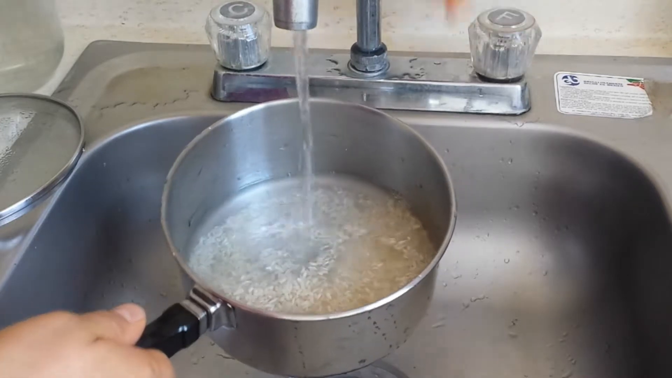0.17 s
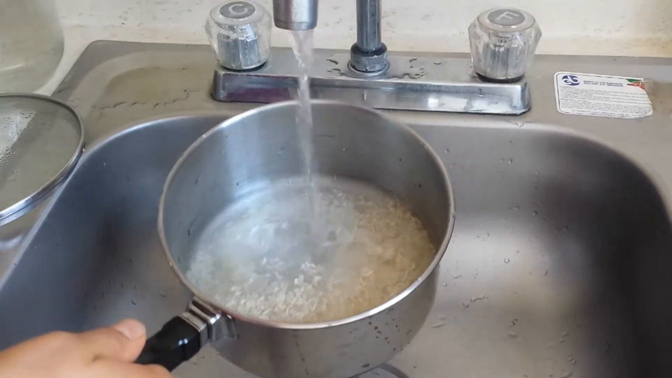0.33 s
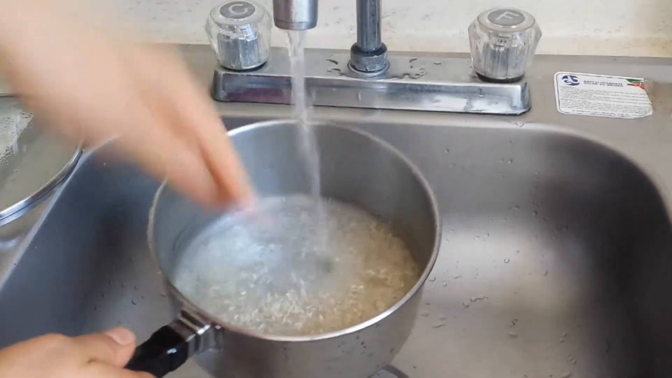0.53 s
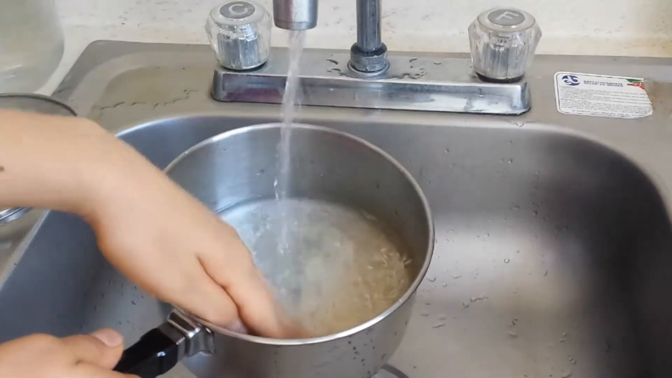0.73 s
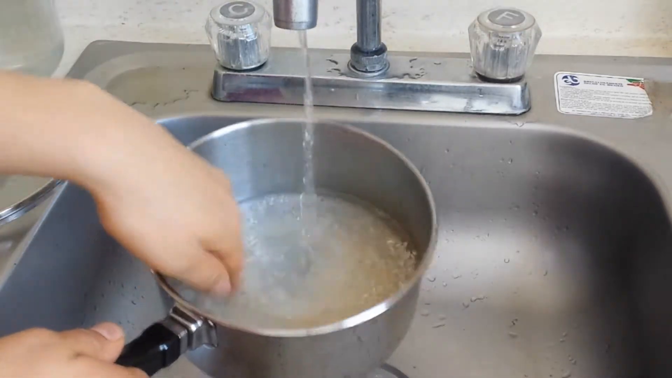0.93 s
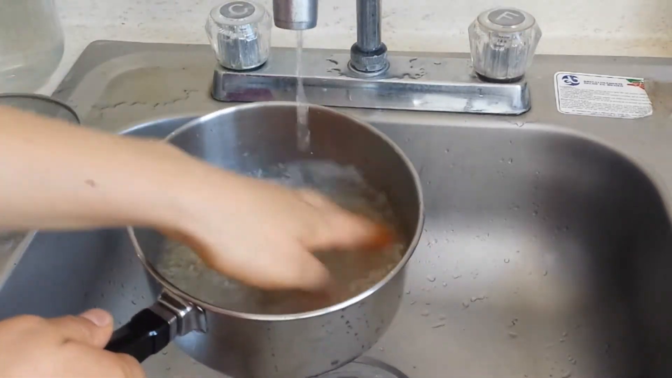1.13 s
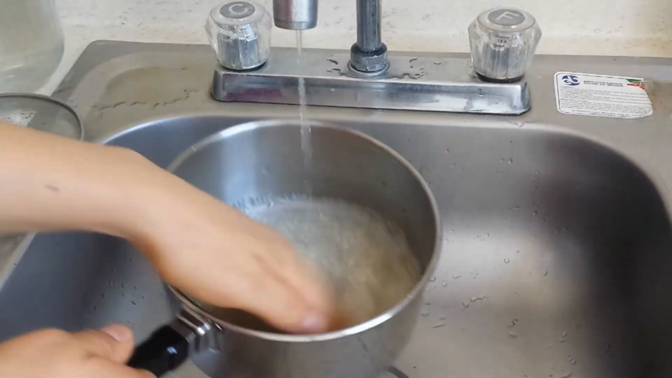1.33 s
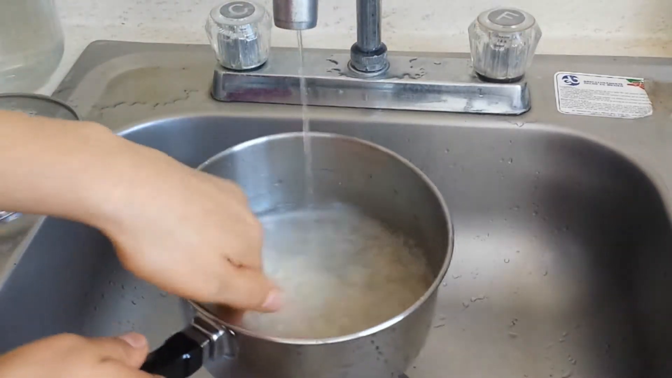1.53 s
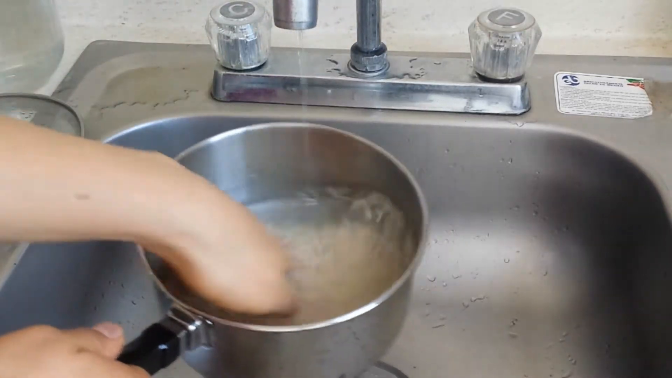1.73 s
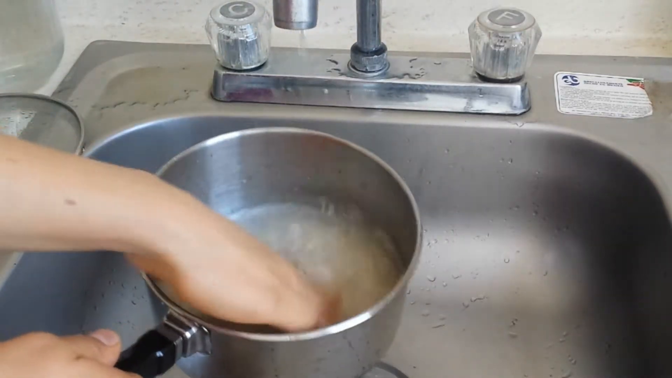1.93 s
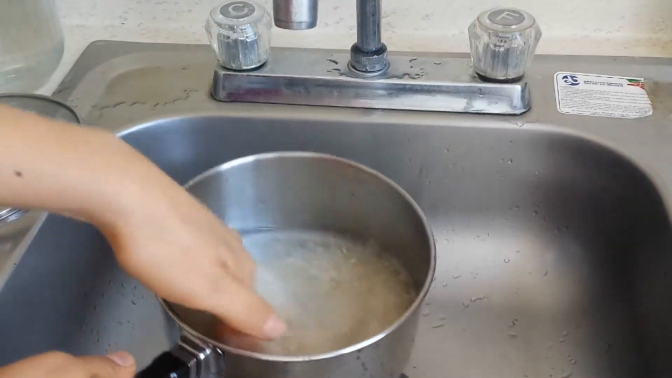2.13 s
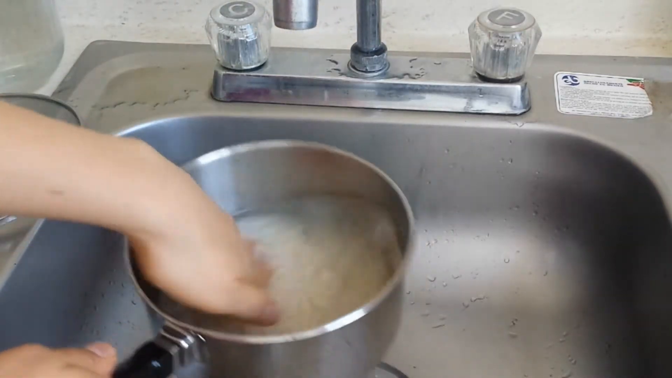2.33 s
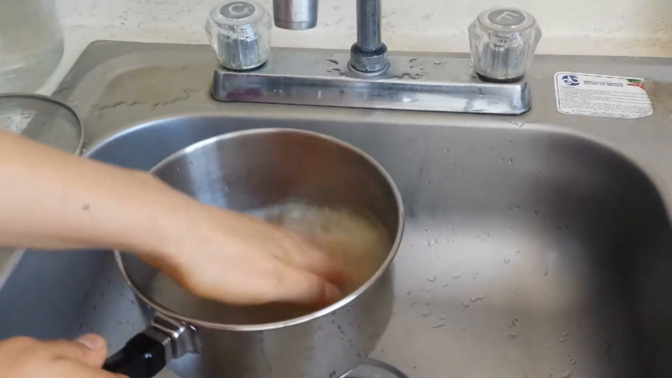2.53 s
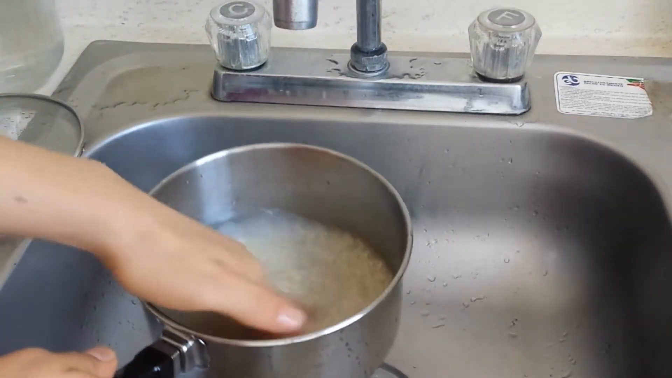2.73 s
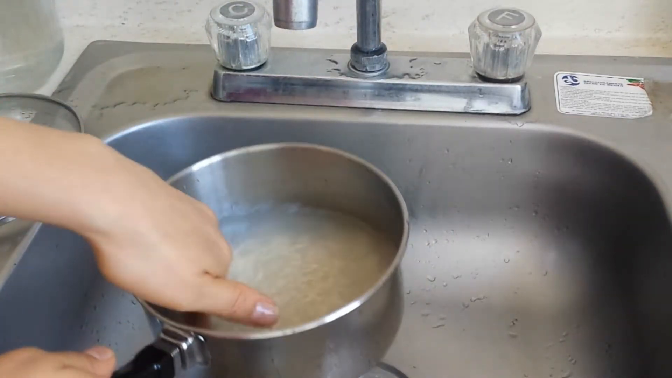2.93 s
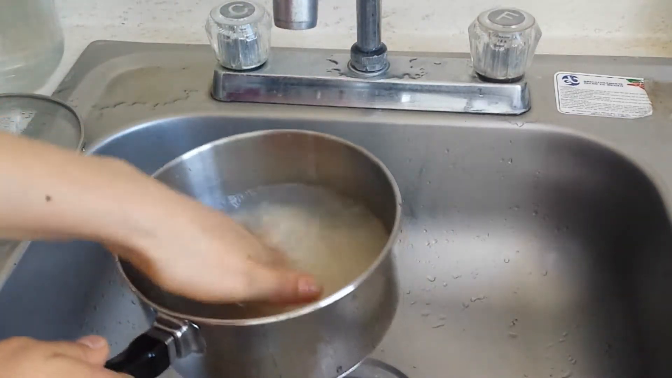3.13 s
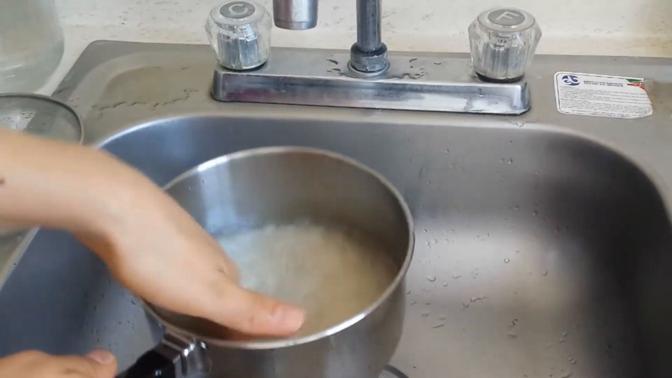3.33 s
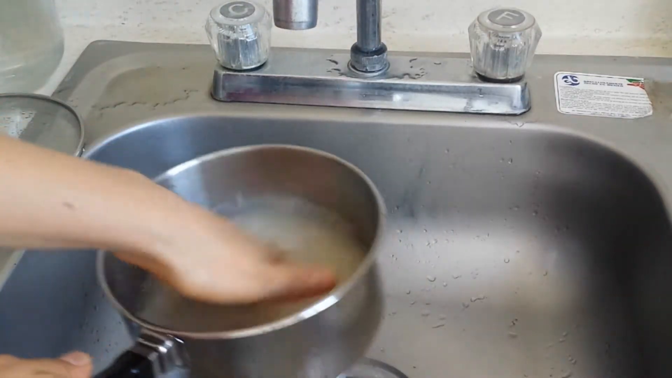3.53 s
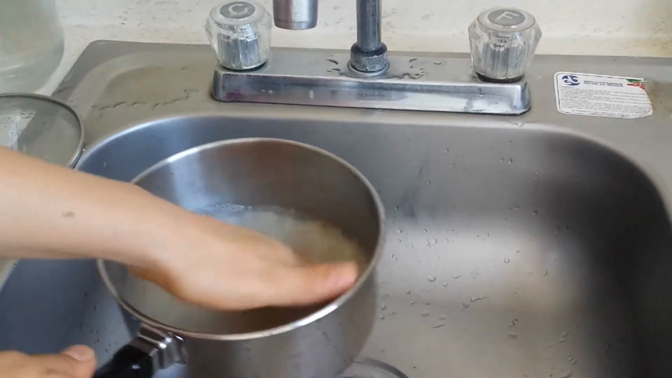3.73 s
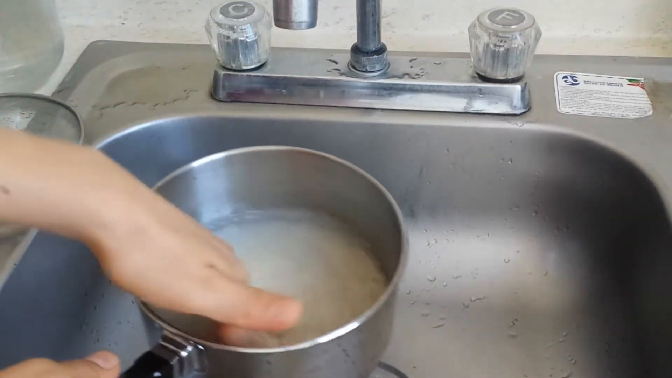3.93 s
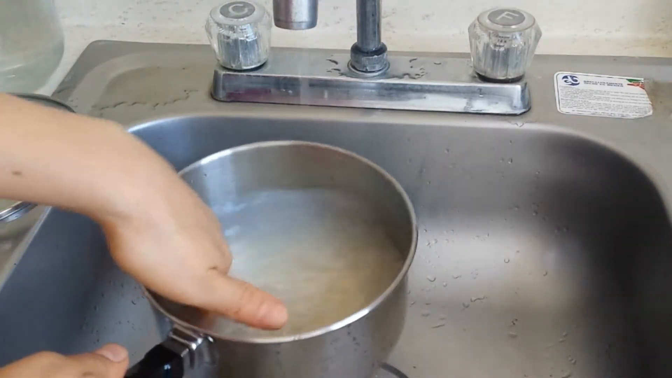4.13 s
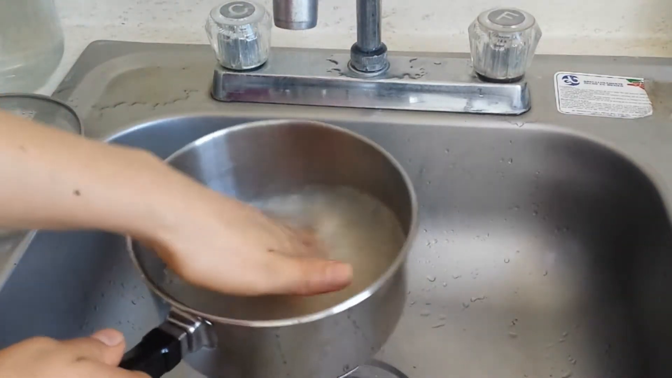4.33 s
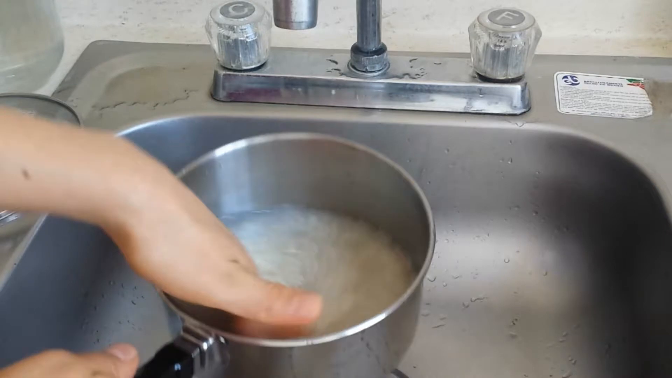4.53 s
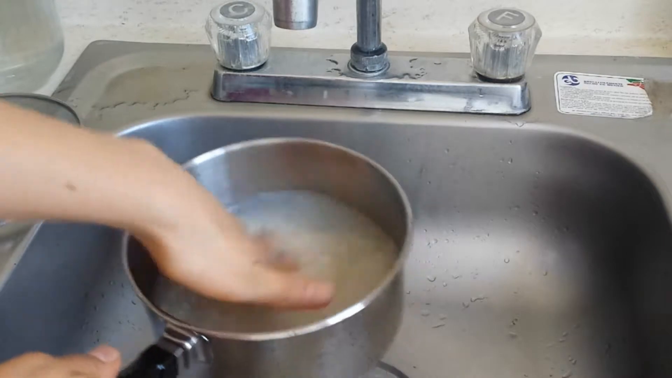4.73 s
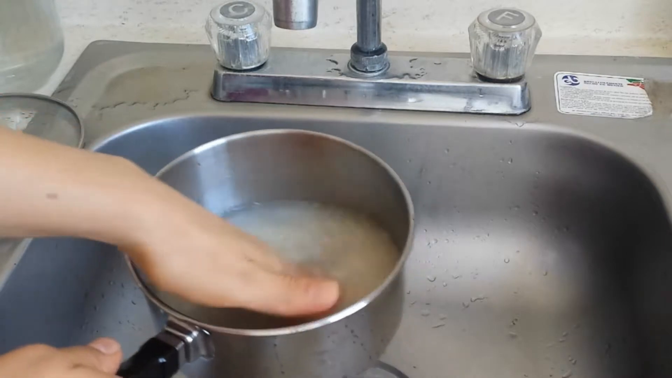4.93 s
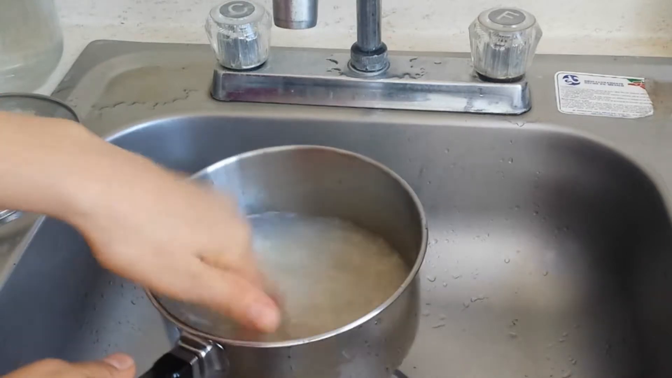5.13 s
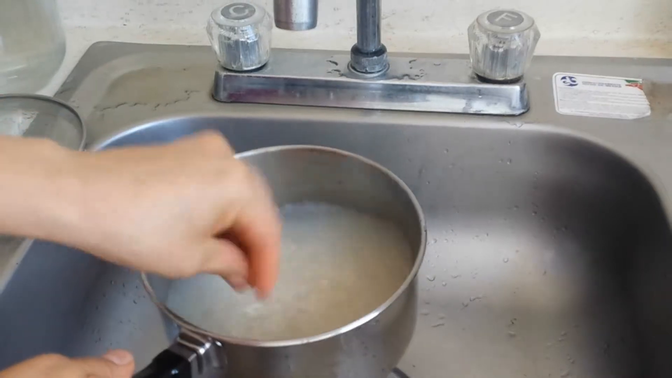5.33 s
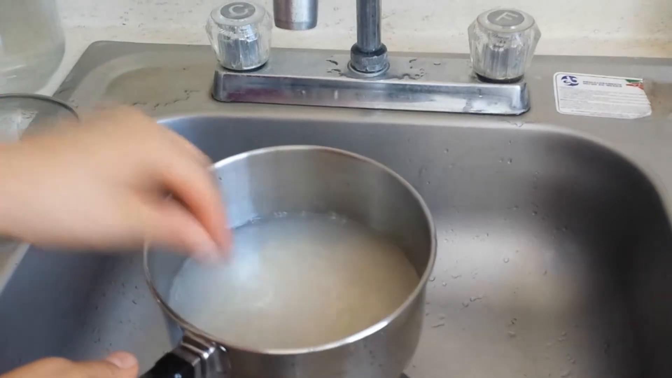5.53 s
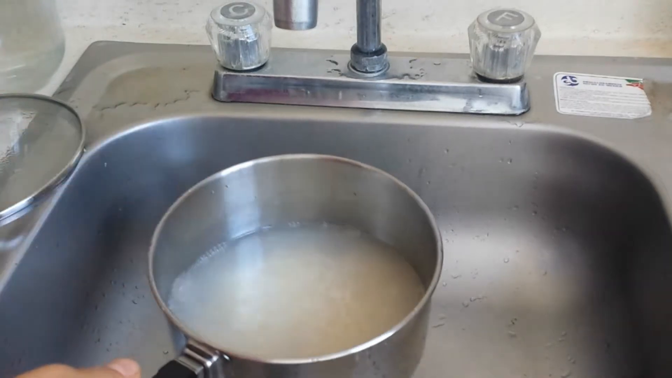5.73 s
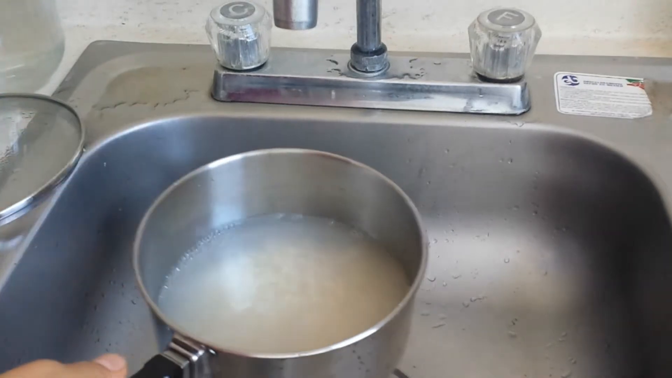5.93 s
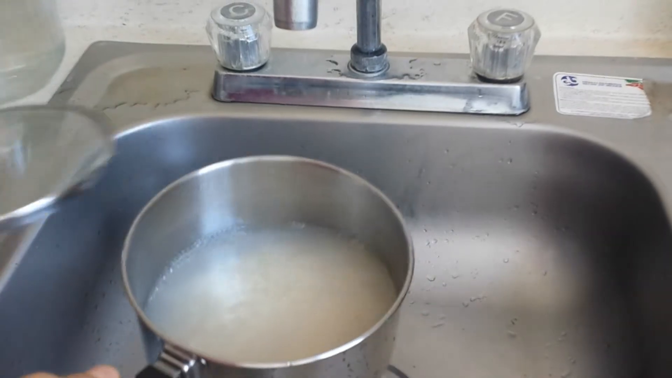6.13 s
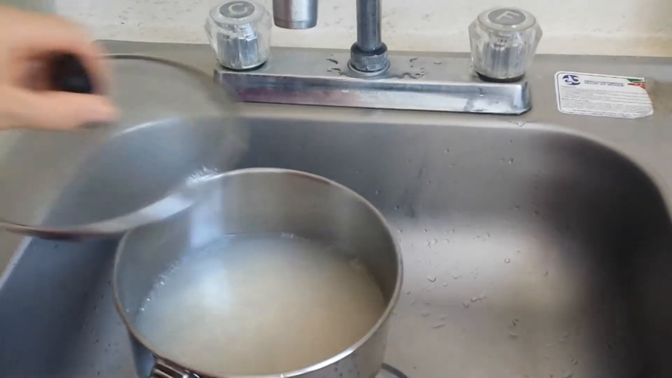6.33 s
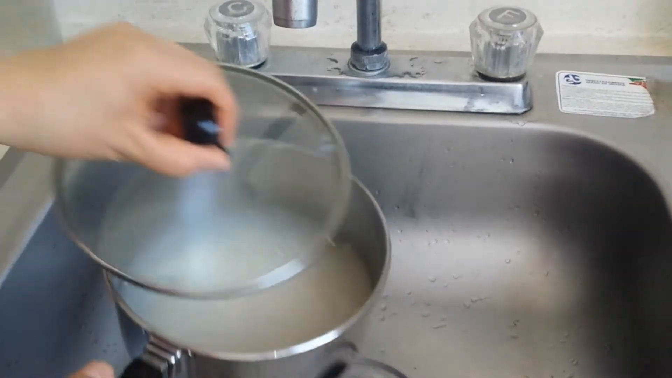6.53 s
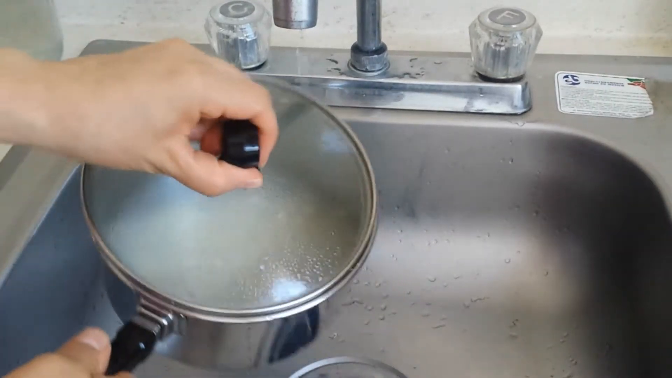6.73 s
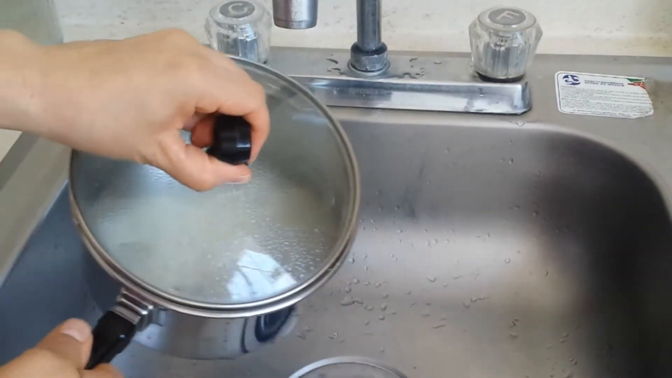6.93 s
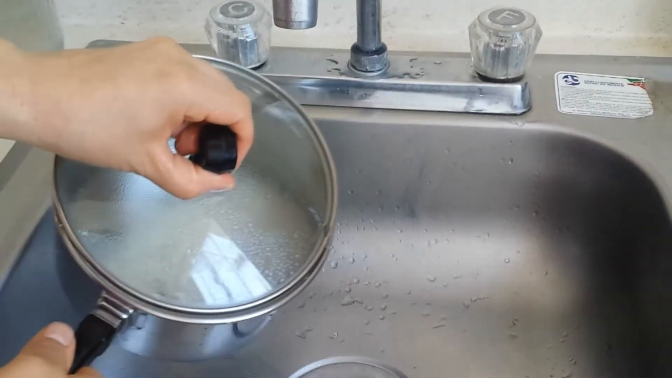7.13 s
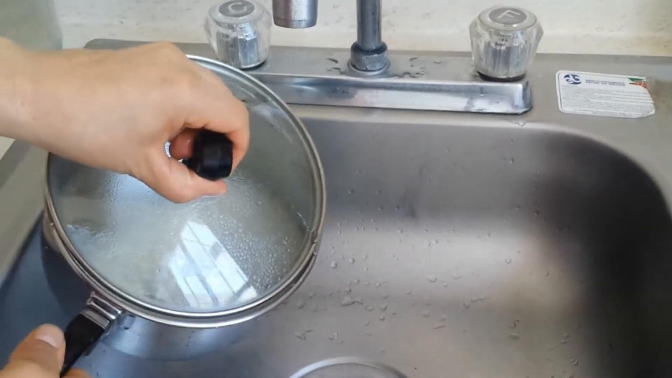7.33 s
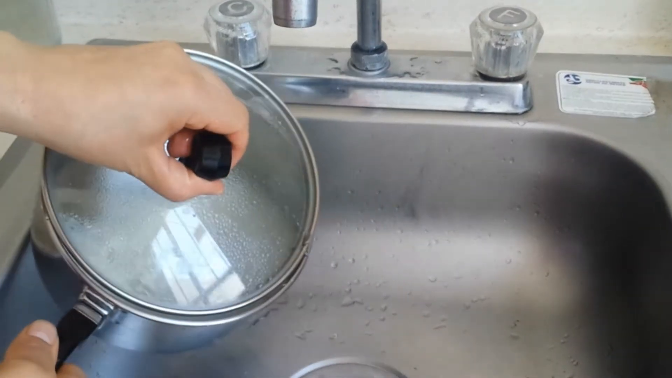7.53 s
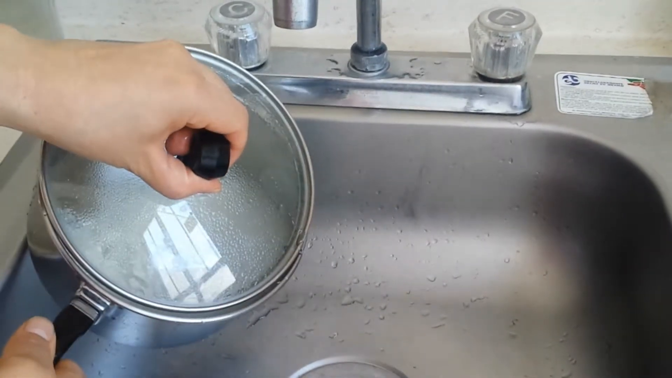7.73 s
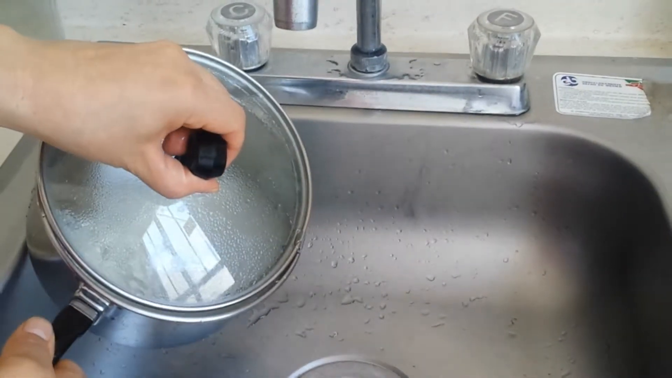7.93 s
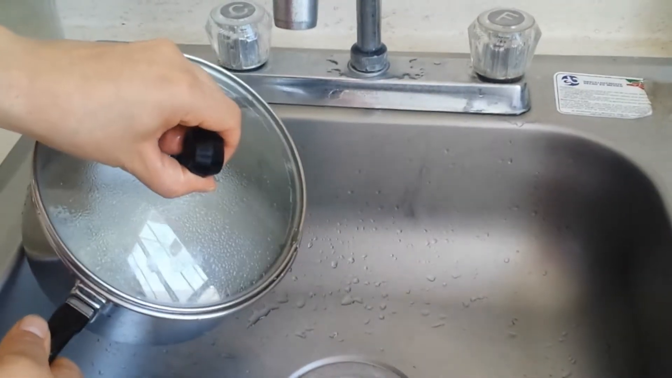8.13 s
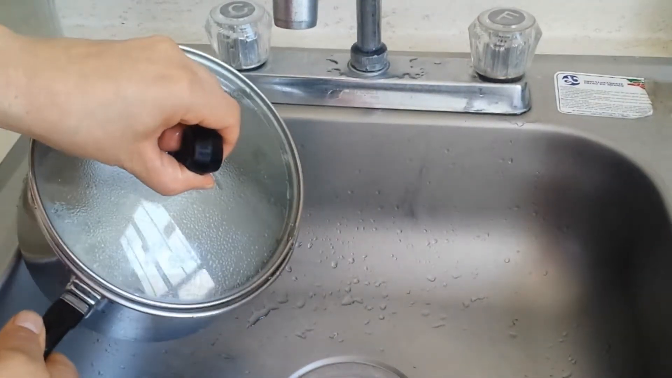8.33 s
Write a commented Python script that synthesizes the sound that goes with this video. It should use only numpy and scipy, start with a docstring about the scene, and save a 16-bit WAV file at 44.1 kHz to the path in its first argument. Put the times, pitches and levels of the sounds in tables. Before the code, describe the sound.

From the start, a tap gulps and splashes into a steel saucepan of rice, with ringing bubbles and drops snapping against the metal. At about 1 second the flow dies down to a thin trickle and a few drips. From roughly 1.3 to 5 seconds a hand stirs the rice in uneven turns: wet grains hiss, slap softly and brush the steel, growing quieter. After a brief lull, a glass lid scrapes off the counter at 6 seconds and rings, followed by a few light knocks. Around 6.7 seconds the lid clatters loudly onto the pan, which bumps the sink with a dull thud. The lid shifts on the rim with a light rasp near 7 seconds and again just after 8. Everything sounds close, with the short echoes of a small, hard kitchen and a faint fridge hum underneath.

```python
"""A tap gulps and splashes into a steel saucepan of rice in a sink, its jet trapping bubbles that ring,
then thins to a few drips. A hand stirs the rice: wet grains hiss and brush the steel. A glass lid sings
as it is dragged off the counter, the pan bumps the sink, and the lid clatters on and shifts twice,
rasping on the rim. Under it all a fridge hums in the small, hard kitchen."""
import sys
import numpy as np
from scipy import signal
from scipy.fft import rfft, irfft
from scipy.io import wavfile
from scipy.ndimage import uniform_filter1d

SR = 44100
rng = np.random.default_rng(int(sys.argv[2]) if len(sys.argv) > 2 else 0)


def transcribe(u):
    """Save the signal u as a 16-bit wav file named by the first command-line argument.

    u: samples, shape (n,) or (channels, n), limited to [-1, 1]; the rate is SR.
    q: integer samples, one column per channel.
    """
    v = np.clip(np.atleast_2d(u).T, -1, 1)
    q = np.round(v * 32767).astype(np.int16)
    wavfile.write(sys.argv[1], SR, q)


N = 369999
T = np.arange(N) / SR

# partials of the fridge hum (f/Hz, level/dB)
FRIDGE_PARTIALS = [(58.6, -71.5), (117.2, -67.5), (175.6, -79.5), (232.8, -71.5), (291, -76), (349, -68.5),
                   (408, -85.5), (468, -81.5), (581.4, -75.5)]
# swell and fade of a faint low drone (t/s, level/dB)
DRONE_SWELL = [(2.4, -91), (3.1, -66), (3.6, -60.5), (3.95, -75), (4.4, -100)]
# room tone of still air (f/Hz, level/dB)
AIR_EQ = [(100, 0.5), (200, -9), (400, -8.5), (600, -8), (1000, -13.5), (1500, -17), (3000, -22.5),
          (6000, -26), (10000, -32), (15500, -36)]
# low rumble of the sink (f/Hz, level/dB)
RUMBLE_EQ = [(20, -21.5), (40, -7), (55, 5), (82, -8.5), (110, -7.5), (150, -5.5), (220, -11.5), (400, -12),
             (900, -31)]
# side signal of a diffuse sound (f/Hz, level/dB)
SIDE_EQ = [(100, -12.5), (300, -9), (550, -3), (1200, 0), (4000, 1)]
# treble imbalance of the two microphone ports, left minus right (f/Hz, level/dB)
PORT_BALANCE = [(700, 0), (3500, 1.5), (4500, 2.5), (5700, 7.5), (7400, -1), (9000, -5), (11000, -5.5),
                (15000, -2.5)]

# modes of the steel-rimmed glass lid (f/Hz, level/dB, t60/s)
LID_MODES = [(720, -15, .3), (877, -1, .15), (1090, -8, .3), (1280, -12, .3), (1830, -10, .12),
             (1930, -8, .2), (3055, -6, .11), (3144, -12, .16), (4335, 0, .13), (4650, -11, .15),
             (5297, -1, .15), (5375, 0, .2), (5940, -10, .12), (6520, -3, .11), (7790, -13, .1),
             (8520, -9, .12)]
# free ring of the lid once off the counter (f/Hz, level/dB, t60/s)
FREE_LID_MODE = [(641.32, -51.5, 0.97)]
# modes of the pan (f/Hz, level/dB, t60/s)
PAN_MODES = [(342, 6, .12), (378, 12, .08), (400, 6.5, .42), (552, -13, .5), (651, -9, .35),
             (694, -13, .15), (825, -14, .3), (1468, 5, .16), (1550, -2, .12), (1900, -3, .1),
             (2126, -5, .15), (2310, -3, .18), (2362, 3.5, .21), (2480, -5, .17), (3876, -4, .14),
             (4210, -8, .2), (4445, 2, .14), (4802, -10, .15)]
# modes of the pan damped by water and the hand (f/Hz, level/dB, t60/s)
WET_PAN_MODES = [(1150, -7, .04), (1980, -10, .02), (2430, 0, .045), (3618, -2, .03)]
# modes of the pan with its lid seated (f/Hz, level/dB, t60/s)
LIDDED_PAN_MODES = [(400, -3, .2), (479, 2, .2), (807, -5, .25), (1640, -11, .12), (1830, -13, .12),
                    (2360, -9, .08), (4220, -11, .1), (4470, -9, .1), (5320, -2, .07), (6960, -14, .08)]
# modes of the sink basin (f/Hz, level/dB, t60/s)
BASIN_MODES = [(206, -18, .3), (234, -16, .3), (257, -14, .3), (285, -7, .42), (322, -10, .2),
               (348, -6, .25), (480, -10, .3)]
# modes of the counter (f/Hz, level/dB, t60/s)
COUNTER_MODES = [(65.2, -8.5, 0.2), (82.4, 4.5, 0.067), (133, 2.5, 0.32), (212, 2, 0.18)]
# clank of thin steel (f/Hz, level/dB)
CLANK_EQ = [(150, -14.5), (350, -5.5), (620, 8.5), (1000, 4.5), (1600, 6.5), (2500, 5), (3500, -0.5),
            (5000, 6), (7500, 2), (11000, -4.5), (15000, -14)]
# dull thud of the basin (f/Hz, level/dB)
THUD_EQ = [(100, -33), (220, -6.5), (350, 0), (520, -4), (800, -12.5), (1400, -22.5), (3000, -38.5)]
# rasp of the lid on the counter (f/Hz, level/dB)
RASP_EQ = [(300, -13), (1000, 3), (1900, 1.5), (2500, -6.5), (3600, -2.5), (4500, -0.5), (8500, 0),
           (15000, -19)]
# hollower tone of a blow on the edge alone (f/Hz, level/dB)
EDGE_EQ = [(400, -1.5), (520, 3), (660, 9), (900, 3), (1250, -2.5), (1470, 2.5), (1750, -8), (2400, -10),
           (3100, -3.5), (3750, -6.5), (4400, -2), (4850, -6), (5400, -0.5)]
# a hand on the knob damps the lid's lowest ring (f/Hz, level/dB)
HELD_LID_EQ = [(900, -4), (3000, 0.5), (6000, -2.5)]
# thin steel radiates little deep bass (f/Hz, level/dB)
STEEL_BASS_EQ = [(20, -28), (90, 0)]
# blows (t/s, lid level/dB, pan level/dB, basin level/dB, tilt/dB per octave, chatter/s, edge-on/0-1)
BLOWS = [(5.993, -49, -66, -41, -7, 0.0009, 1), (6.018, -37, -73.5, -44, -9, 0.00334, 0.76),
         (6.053, -41.5, -55, -35, 1, 0.003184, 0.7), (6.4226, -34.5, -71, -45, -0.5, 0.06066, 0.37),
         (6.499, -44.5, -68, -50, -1, 0.014, 0.5), (6.6624, -19, -31, -35, -0.34, 0.0017, 0.8),
         (6.685, -18, -31, -46.5, -3, 0.011, 0.77), (6.7138, -17.5, -22, -30.5, -0.4, 0.0062, 0.84),
         (6.7665, -17, -15, -23.5, -0.3052, 0.0024, 0), (6.7731, -24, -28.5, -39, -0.7, 0.0044, 0),
         (6.804, -36, -34.5, -33.5, -6.5, 0.003483, 0.1), (6.903, -46, -46, -43, -2.5, 0.00395, 0.1),
         (6.972, -36.5, -58, -54, -4.5, 0.009, 0), (7.129, -41.5, -76, -73, -5.5, 0.004, 0.2)]
# dull bumps that shake the counter (t/s, level/dB)
COUNTER_BUMPS = [(6.051, -49.5), (6.421, -49.5), (6.478, -50.5), (6.771, -39.5), (6.803, -51),
                 (8.18, -53.5)]
# lid shifting on the rim (peak t/s, build/s, release/s, rasp level/dB, song level/dB, basin level/dB)
RIM_SLIDES = [(6.95, 0.2, 0.019, -62, -59, -48.5), (7.141, 0.031, 0.034, -50.5, -64, -53),
              (8.118, 0.0095, 0.0084, -52.5, -57, -64), (8.146, 0.018, 0.014, -49.5, -55, -57),
              (8.185, 0.019, 0.014, -54.5, -52, -47), (8.385, 0.1, .05, -59, -73, -54.5)]

# turns of the hand through the rice (peak t/s, half length/s, level/dB)
HAND_TURNS = [(1.496, 0.29, -54), (1.75, 0.15, -58), (1.961, 0.16097, -53.5), (2.252, 0.1211, -57),
              (2.582, 0.16, -62.5), (2.799, 0.15, -63), (2.968, 0.085, -60), (3.224, 0.23, -61),
              (3.57, 0.17, -56), (3.855, 0.097, -65.5), (4.127, 0.17, -64.5), (4.35, 0.32, -62.5),
              (4.684, 0.13, -66.5), (4.905, 0.27, -65)]
# grains pressed along the steel (peak t/s, half length/s, level/dB)
GRAIN_DRAGS = [(1.911, 0.06, -65), (2.237, 0.035, -67), (3.02, 0.092, -78), (3.46, 0.06, -70),
               (3.699, 0.01, -60.5), (4.07, 0.043, -74), (4.19, 0.044, -57.5), (4.654, 0.019, -66.5),
               (4.953, 0.0361, -74)]
# wet rice slapping back behind the fingers (t/s, level/dB)
RICE_SLAPS = [(1.565, -80), (1.92, -50), (3.042, -55.5), (3.483, -51), (3.551, -53), (3.615, -63),
              (3.698, -60), (4.35, -65)]
# hiss of wet rice (f/Hz, level/dB)
RICE_EQ = [(500, -10), (1200, -11), (2000, -16), (3000, -12.5), (4200, -8.5), (5600, -1), (7000, -4),
           (10000, -10), (15000, -20.5)]

# drops spitting against the steel wall (t/s, level/dB)
WALL_DROPS = [(.055, -17), (.095, -10), (.111, -11), (.164, -11), (.195, -7.5), (.247, -13), (.289, -10),
              (.3735, -6), (.42, -7), (.433, -13), (.4765, -8.5), (.4823, -3), (.5462, -2), (.608, -12),
              (.621, -9), (.648, -10), (.657, -9), (.692, -10), (.7287, -7), (.756, -13), (.804, -8.5),
              (.819, -8), (.9088, 3), (.943, -4), (.9704, -6), (.995, -12), (1.043, -9), (1.06, -5),
              (1.118, -5), (1.155, -3), (1.3034, -15), (1.564, -10), (1.88, -15), (1.918, -16),
              (3.0445, -19), (3.2, -25), (3.483, -13), (4.15, -26), (4.24, -26), (4.37, -28)]
# bright snap of those drops (f/Hz, level/dB)
SNAP_EQ = [(1500, -38.5), (3500, -2), (7500, 3.5), (15000, -16)]
# the loudest single bubbles and drips (t/s, f/Hz, level/dB, ring length/cycles)
SOLO_BUBBLES = [(0.0947, 2877, -25.5, 25), (0.096, 5900, -28, 48.13), (0.194, 8469, -30, 48),
                (.247, 4291, -38, 21.14), (0.291, 2690, -19.5, 33), (0.374, 6397, -20, 9.1),
                (0.42, 4200, -16.5, 11), (0.459, 1280, -34, 30), (0.501, 679, -25.5, 62),
                (0.531, 1240, -36, 38), (0.12, 865.7, -26.5, 25), (0.124, 1590, -32, 42),
                (0.134, 1553, -43, 22.4), (0.478, 2988, -21, 69), (0.484, 6440, -17.5, 41),
                (0.546, 7500, -17.5, 19), (0.608, 3600, -19.5, 34), (.729, 2260, -23, 33),
                (0.779, 3340, -27, 110), (0.812, 5770, -17, 11), (0.833, 2535, -23.5, 57),
                (0.91, 7100, -9.5, 20.65), (0.918, 5540, -14.5, 29), (0.926, 1083, -24, 11),
                (.941, 4700, -18, 40), (.946, 718, -29, 89), (1.061, 6900, -12, 14),
                (1.119, 8072, -15, 8.1), (1.155, 1490, -22, 21), (1.1553, 5117, -21.5, 12.82),
                (1.304, 6848, -41, 17), (1.373, 3920, -25.5, 25), (1.495, 4490, -28, 19),
                (1.5645, 6253, -27, 39), (1.649, 1637, -25, 53), (1.655, 1896, -34, 75),
                (1.88, 7020, -22, 2.5), (1.9169, 4100, -17, 5.5), (3.043, 6540, -38, 35.96),
                (3.483, 3650, -29.5, 47), (3.552, 6300, -32, 92.7), (3.565, 2016, -50.5, 65),
                (3.701, 4730, -32.5, 22), (4.293, 8525, -32, 10), (5.411, 6124, -52.5, 43.1),
                (5.453, 6460, -53.5, 50.14)]
# large air pockets gulped under the jet (t/s, f/Hz, level/dB)
AIR_POCKETS = [(.008, 245, -27.5), (.065, 302.9, -25), (.083, 320, -23), (.134, 275, -27), (.466, 990, -39),
               (.47, 855, -40), (.553, 1000, -35.5), (.572, 700, -28), (.585, 794, -32), (.601, 817, -30.5),
               (.601, 1400, -39.5), (.625, 640, -38), (.672, 818, -34), (.72, 765, -39), (.74, 1050, -38.5),
               (.745, 1460, -41), (.818, 990, -39), (.835, 840, -41), (.872, 845, -32), (.878, 1000, -36.5),
               (.891, 825, -46.5), (.93, 850, -34.5), (.936, 1200, -42.5), (.961, 693, -32.5),
               (1.103, 1340, -40), (1.119, 930, -35.5), (1.132, 830, -39.5)]
# splash of the jet in the pan (f/Hz, level/dB)
SPLASH_EQ = [(200, -21.5), (500, -4), (850, 15), (1200, 1), (2000, -2.5), (2700, 8.5), (4000, 7), (6500, 7),
             (10000, -1.5), (15000, -3)]

TAP_CLOSES_S, TOP_HZ = 0.91, 15700


def undb(db):
    """Decibels to gain."""
    return np.exp(np.asarray(db) * np.log(10) / 20)


def unit(x):
    """Scale to rms 1."""
    return x / np.sqrt(np.mean(x ** 2))


def add(out, s, x):
    """Mix x into out from time s."""
    i = max(int(s * SR), 0)
    out[i:i + len(x)] += x[:max(N - i, 0)]


def through(x, response):
    """Pass x through an impulse response."""
    return signal.oaconvolve(x, response)[:len(x)]


def eq(x, points, size=4096):
    """Minimum-phase EQ through (f/Hz, level/dB) points."""
    hz, db = np.transpose(points)
    f = np.maximum(np.arange(size // 2 + 1) * SR / size, 1)
    cepstrum = irfft(np.log(undb(np.interp(np.log(f), np.log(hz), db))))
    cepstrum[1:size // 2] *= 2
    cepstrum[size // 2 + 1:] = 0
    return through(x, irfft(np.exp(rfft(cepstrum))))


def fade(t, t60):
    """Exponential decay, 60 dB down at t60."""
    return np.exp(-np.log(1000) * t / t60)


def swell(s, half_length):
    """Bell-shaped envelope that peaks at time s."""
    return np.exp(-((T - s) / half_length) ** 2)


def jolts(rows, fall_s):
    """Envelope of sudden (t/s, level/dB) hits that each die away."""
    return sum(undb(db) * (T >= s) * np.exp(-np.abs(T - s) / fall_s) for s, db in rows)


def flutter(hz):
    """Random modulation that changes hz times a second; spread near 1."""
    return np.interp(T * hz, np.arange(N), rng.standard_normal(N))


def ring(modes):
    """Impulse response of (f/Hz, level/dB, t60/s) modes, with alternating signs."""
    t = T[:SR]
    return sum((-1) ** k * undb(db) * fade(t, t60) * np.sin(2 * np.pi * hz * t)
               for k, (hz, db, t60) in enumerate(modes))


def burst(t60):
    """Decaying noise of unit energy: a thicket of modes or echoes."""
    t = T[:int(t60 * SR)]
    x = rng.standard_normal(len(t)) * fade(t, t60)
    return np.pad(x / np.linalg.norm(x), (0, SR))[:SR]


def ticks(per_s, spread_db):
    """Random tiny impacts, a few much larger than the rest; rms 1."""
    size = undb(spread_db * np.minimum(rng.exponential(size=N), 5))
    return unit((rng.random(N) < per_s / SR) * size * rng.choice([-1, 1], N))


def spread(mid, side):
    """Left and right of a diffuse sound: alike in the bass, unrelated in the treble."""
    side = eq(side, SIDE_EQ)
    return np.array([mid + side, mid - side]) / np.sqrt(2)


def noise_bed(shape):
    """Steady stereo noise with the given EQ."""
    mid, side = (unit(eq(rng.standard_normal(N), shape)) for _ in range(2))
    return spread(mid, side)


def fridge_and_drone(settle_s=2.72, drone_hz=81):
    """The fridge's wavering hum starts strong and settles; a faint low drone swells and goes."""
    hum = 0
    for hz, db in FRIDGE_PARTIALS:
        waver = np.interp(T, np.linspace(0, T[-1], 30), rng.standard_normal(30))
        phase = 2 * np.pi * (hz * T + rng.random()) + .6 * waver
        hum = hum + undb(db + 1.5 * waver) * np.sin(phase)
    settling = undb(-5.5 + 15.5 * np.exp(-T / settle_s))
    drone_db = np.interp(T, *np.transpose(DRONE_SWELL), left=-120, right=-120)
    drone = undb(drone_db) * np.sin(2 * np.pi * drone_hz * T + waver)
    return np.sqrt(2) * (hum * settling + drone)


def sink_rumble():
    """The sink rumbles faintly at rest, and more under the jet, the stirring and the bumps."""
    rest = undb(-67.5)
    jet = undb(-52.5) * jet_flow()
    hand = undb(-2) * hand_effort()
    bumps = undb(-14.5) * jolts(COUNTER_BUMPS, fall_s=0.28)
    return np.sqrt(rest ** 2 + jet ** 2 + hand ** 2 + bumps ** 2) * noise_bed(RUMBLE_EQ)


def echoes(x, t60, shape):
    """A diffuse stereo reverb tail with the given EQ."""
    onset = np.minimum(T[:SR] / 0.00038, 1)
    tails = spread(eq(burst(t60), shape), eq(burst(t60), shape)) * onset
    return np.array([through(x, tail[:int(t60 * SR)]) for tail in tails])


def kitchen(x, sink_db, sink_t60, room_db, room_t60, spots=3):
    """Direct sound, quick echoes between the steel walls, then the room's tail."""
    # the microphone ports face sideways, so little treble reaches them directly
    out = eq(x, [(400, -1), (1500, -3), (5000, -6), (10000, -7)])
    # the sound hops between spots in the pan, each with its own echoes
    spot = (T / .023).astype(int) % spots
    for k in range(spots):
        share = np.sqrt(np.abs(uniform_filter1d(1. * (spot == k), size=256)))
        out = out + undb(sink_db) * echoes(x * share, sink_t60, [(300, -10), (900, 1), (4000, 2)])
    return out + undb(room_db) * echoes(x, room_t60, [(250, 3), (2000, 6), (7000, 1.5), (15000, -10)])


def basin():
    """The sink's ring under a dull thud that differs with each point of contact."""
    return undb(-4.5) * ring(BASIN_MODES) + undb(46) * eq(burst(t60=0.27), THUD_EQ)


def clank():
    """The countless short-lived modes of thin steel; each point of contact wakes a different mix."""
    return undb(23) * eq(burst(t60=.13), CLANK_EQ)


def beating_ring(modes, detune=0.00806, twin_db=-3.5):
    """A round body is never quite round: each mode has a weaker twin that beats with it."""
    return ring(modes) + ring([(hz * (1 + detune), db + twin_db, t60) for hz, db, t60 in modes])


def grip(s, build_s, release_s):
    """Friction that builds up to time s and then lets go."""
    return np.exp(-np.maximum((s - T) / build_s, (T - s) / release_s).clip(None, 20))


def sing(modes, push):
    """Uneven friction feeds each mode and shakes its phase; the mode stores the energy and rings on."""
    out = 0
    for hz, db, t60 in modes:
        retained = fade(1 / SR, t60) ** 2
        energy = signal.lfilter([1 - retained], [1, -retained], push ** 2)
        out = out + undb(db) * np.sqrt(energy) * np.sin(2 * np.pi * hz * T + .85 * flutter(hz=130))
    return out


def rub(body, push):
    """Dense little slips rasp on a body, given as its impulse response."""
    return through(ticks(per_s=3000, spread_db=1) * push, body / np.linalg.norm(body))


def lid_drag():
    """The lid scrapes over the counter: the glass sings, damped by the contact, and the sink rumbles."""
    push = grip(6.061, build_s=0.019, release_s=0.0014)
    rasp = rub(eq(burst(t60=0.056), RASP_EQ), push)
    song = sing([(hz, db, t60 * .55) for hz, db, t60 in LID_MODES], push ** 1.3)
    return undb(-33) * song + undb(-32) * rasp + undb(-37.5) * rub(basin(), push)


def lid_slides():
    """The lid shifts on the rim: steel rasps, the closed pan sings and its base grinds on the sink."""
    rasp = song = grind = 0
    for s, build_s, release_s, rasp_db, song_db, basin_db in RIM_SLIDES:
        push = grip(s, build_s, release_s)
        rasp += undb(rasp_db) * push
        song += undb(song_db) * push
        grind += undb(basin_db) * push
    return rub(clank(), rasp) + sing(LIDDED_PAN_MODES, song) + rub(basin(), grind)


def clatter(lid_lifted_s=6.425):
    """Blows ring the lid, the pan and, through its base, the basin and counter."""
    lid = undb(-21) * eq(beating_ring(LID_MODES), HELD_LID_EQ)
    pan = undb(-17) * beating_ring(PAN_MODES)
    out = np.zeros(N)
    for s, lid_db, pan_db, basin_db, tilt, chatter_s, edge in BLOWS:
        # the rim lands at one point, then chatters down along its length
        rattle = rng.standard_normal(SR) * (rng.random(SR) < .05) * np.exp(-T[:SR] / chatter_s)
        force = eq(rattle / (np.linalg.norm(rattle) + 1e-9), [(700, -11), (3000, -3.5)])
        force[0] += .8
        body = undb(lid_db) * (lid + clank()) + undb(pan_db) * pan
        body = eq(body, [(hz, edge * db) for hz, db in EDGE_EQ])
        hit = eq(through(body, force), [(250, -2 * tilt), (16000, 4 * tilt)])
        add(out, s, hit + undb(basin_db) * basin())
    add(out, lid_lifted_s, ring(FREE_LID_MODE))
    for s, db in COUNTER_BUMPS:
        add(out, s, undb(db) * ring(COUNTER_MODES))
    return eq(out, STEEL_BASS_EQ)


def bubble(hz, cycles, rise=0.14):
    """A bubble pinches off with a click, rings down and rises in pitch as it nears the surface."""
    life = max(cycles, 2) / hz
    t = T[:int(life * SR)]
    attack = np.minimum(t * hz * 8 + .3, 1)
    return np.cos(2 * np.pi * hz * t * (1 + rise * t / life / 2)) * fade(t, life) * attack


def fizz(start_s, end_s, per_s, lo_hz, hi_hz, cycles, spread_db):
    """A swarm of bubbles of mixed sizes; rms 1 while it lasts."""
    out, span = np.zeros(N), end_s - start_s
    for when, pitch, chance in rng.random((8000, 3))[:int(per_s * span)]:
        hz = min(lo_hz * (hi_hz / lo_hz) ** pitch, TOP_HZ)
        strength = undb(-spread_db * np.log(.03 + chance))
        add(out, start_s + when * span, strength * hz / hi_hz * bubble(hz, cycles))
    return unit(out) * np.sqrt(span * SR / N)


def hand_effort():
    """Envelope of the stirring hand: each turn swells and eases off."""
    return np.sqrt(sum((undb(db) * swell(s, length)) ** 2 for s, length, db in HAND_TURNS))


def stirring():
    """Wet grains click on each other, froth bursts, and grains dragged over the steel ring the pan."""
    grains = ticks(per_s=1400, spread_db=4.4)
    froth = fizz(1.1, 5.6, per_s=410, lo_hz=1870, hi_hz=13050, cycles=22, spread_db=5.5)
    hiss = eq(undb(6.5) * grains + undb(3.5) * froth, RICE_EQ)
    scratch = ticks(per_s=2000, spread_db=2)
    scuff = unit(eq(scratch, [(300, 11), (900, 19), (3000, -40), (8000, -25)]))
    brush = unit(through(scratch, ring(WET_PAN_MODES))) + undb(-10) * scuff
    clumps = undb(-flutter(hz=29.87))  # rice slips through the fingers in clumps
    churn = hand_effort() * clumps + jolts(RICE_SLAPS, fall_s=0.019)
    drags = sum(undb(db) * swell(s, length) for s, length, db in GRAIN_DRAGS)
    pressure = drags + undb(-19) * hand_effort()  # every turn also rubs the pan
    stick_slip = undb(flutter(hz=44.9))
    return hiss * churn + brush * pressure * stick_slip


def jet_flow(closing_db_per_s=49.5):
    """Strength of the jet: 1 while the tap is open, falling as it is closed."""
    return undb(-closing_db_per_s * np.maximum(T - TAP_CLOSES_S, 0))


def spatter():
    """Drops snap against the steel wall: a few loud ones, and a fine crackle while the jet runs."""
    snaps = undb(-53) * jet_flow() * ticks(per_s=70, spread_db=4.5)
    for s, db in WALL_DROPS:
        add(snaps, s, undb(db) * burst(t60=.007))
    return eq(snaps, SNAP_EQ)


def plinks(shed_db=-11, shed_within_s=0.004):
    """Single bubbles and drips ring out; each pinch-off sheds three smaller, short-lived bubbles."""
    out = np.zeros(N)
    for s, hz, db, cycles in SOLO_BUBBLES:
        add(out, s, undb(db) * bubble(hz, cycles, rise=0.07108))
        for delay, pitch in rng.random((3, 2)):
            fragment = bubble(min(hz * (1 + 0.52 * pitch), TOP_HZ), cycles=7.922)
            add(out, s + shed_within_s * delay, undb(db + shed_db) * fragment)
    return out


def gulps(split_db=-1, split_within_s=.035):
    """A large air pocket is driven for a few cycles while it closes, then breaks into three bubbles."""
    out = np.zeros(N)
    for s, hz, db in AIR_POCKETS:
        width_s = 0.0056946 * (300 / hz) ** 0.31  # higher-pitched pockets close faster
        t = T[:int(6 * width_s * SR)] - 3 * width_s
        tone = np.sin(2 * np.pi * hz * t * (1 + 0.02043 * t / width_s))
        add(out, s + t[0], undb(db) * np.exp(-(t / width_s) ** 2 / 2) * tone)
        for delay, pitch in rng.random((3, 2)):
            fragment = bubble(hz * (0.91 + 0.97 * pitch), cycles=3.7)
            add(out, s + split_within_s * delay, undb(db + split_db) * fragment)
    return out


def tap_jet(fill_db_per_s=8, burble_build_s=0.28, thread_ends_s=2.4, cavity_hz=291.6):
    """The jet throws spray, beats bubbles into the water and at first holds a throbbing cavity open."""
    swarm = fizz(0, 1.8, per_s=1200, lo_hz=650, hi_hz=14000, cycles=16, spread_db=2.5)
    spray = ticks(per_s=400, spread_db=5.6)
    splash = eq(undb(-3.5) * swarm + spray, SPLASH_EQ)
    burble = fizz(0, 1.3, per_s=150, lo_hz=600, hi_hz=1700, cycles=12, spread_db=2)
    # splash and burble grow as the water deepens
    splash_gain = jet_flow() * undb(-53 + fill_db_per_s * np.minimum(T, TAP_CLOSES_S))
    burble_gain = jet_flow() * undb(-59.5) * np.minimum(T / burble_build_s, 1)
    thread_gain = undb(-83) * (T < thread_ends_s)  # the closed tap leaves a thin thread of water
    throb = np.sqrt(2) * np.sin(2 * np.pi * cavity_hz * T + .4 * flutter(hz=50))
    cavity = undb(-41 + 2 * flutter(hz=60)) * swell(0.094, half_length=0.2) * throb
    return (splash_gain + thread_gain) * splash + burble_gain * burble + cavity


def scene():
    """Water, rice, steel and glass in the kitchen's echoes, over a bed of hum, air and rumble."""
    water = plinks() + gulps() + tap_jet() + stirring() + undb(-2.5) * spatter()
    water = kitchen(water, sink_db=-1, sink_t60=0.11, room_db=-6, room_t60=0.41)
    knocks = kitchen(clatter(), sink_db=-3.5, sink_t60=0.059, room_db=-6, room_t60=0.44)
    # the lid's scrapes ring with short sink echoes and a little less room than the knocks
    scrapes = kitchen(lid_drag() + lid_slides(), sink_db=-3.5, sink_t60=0.04, room_db=-8.5, room_t60=0.5)
    # high on the wall, the drops face the microphone
    snaps = undb(-6) * spread(spatter(), spatter())
    bed = fridge_and_drone() + undb(-66) * noise_bed(AIR_EQ) + sink_rumble()
    return bed + scrapes + knocks + snaps + water


def record(dry):
    """Each microphone port colours its own side; the top is cut steeply."""
    left = eq(dry[0], [(hz, db / 2) for hz, db in PORT_BALANCE])
    right = eq(dry[1], [(hz, -db / 2) for hz, db in PORT_BALANCE])
    return signal.sosfilt(signal.ellip(8, .2, 70, TOP_HZ, fs=SR, output="sos"), [left, right])


dry = scene()
out = record(dry)
transcribe(out)
```